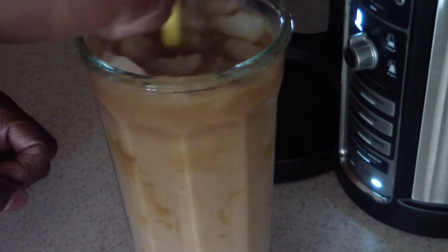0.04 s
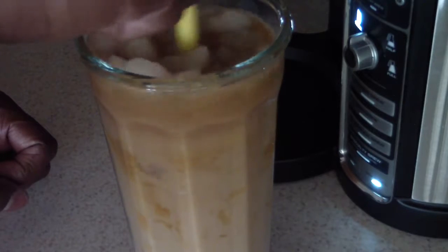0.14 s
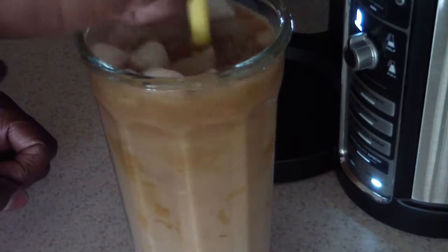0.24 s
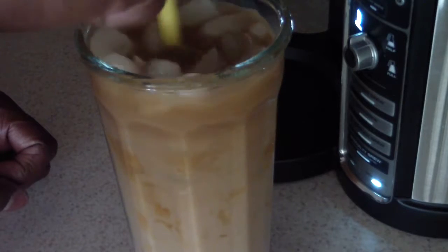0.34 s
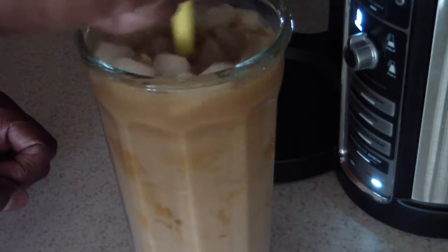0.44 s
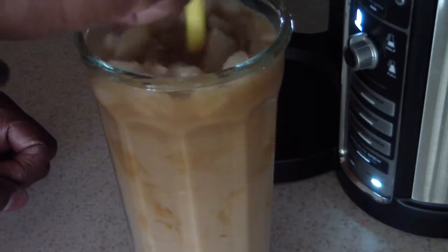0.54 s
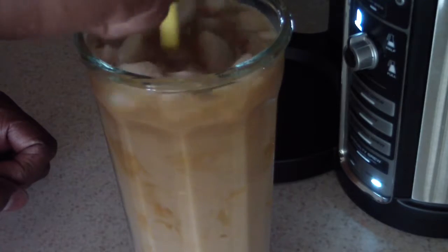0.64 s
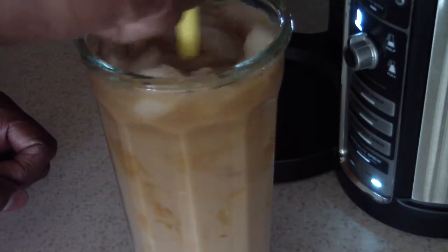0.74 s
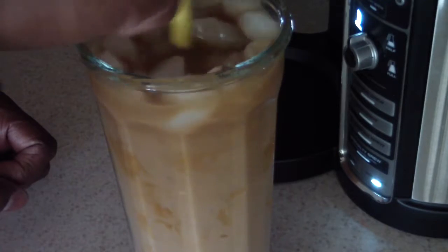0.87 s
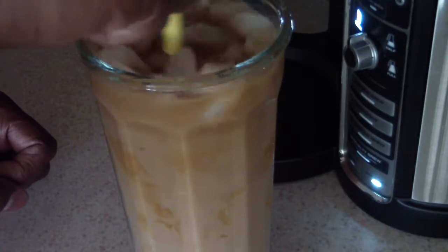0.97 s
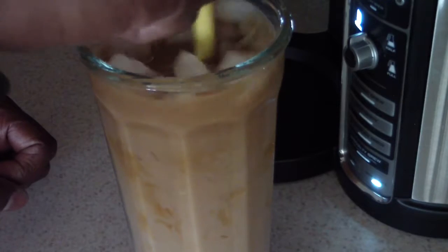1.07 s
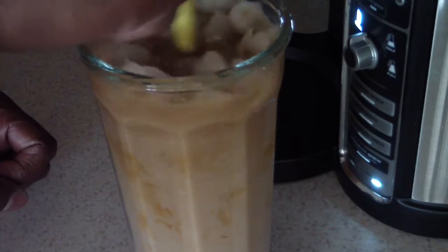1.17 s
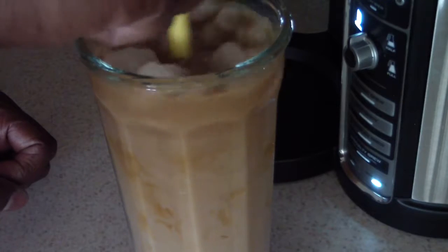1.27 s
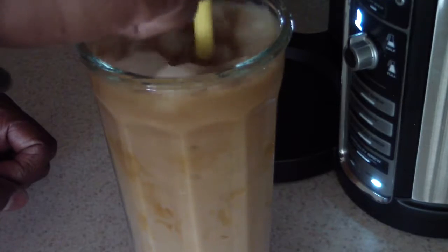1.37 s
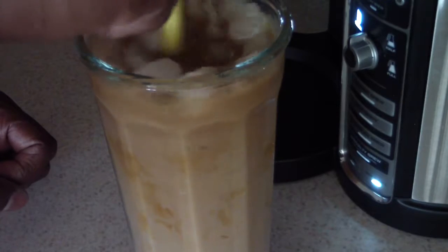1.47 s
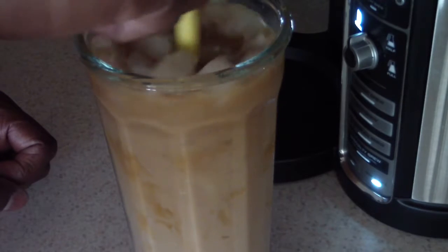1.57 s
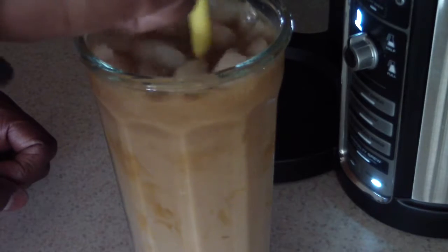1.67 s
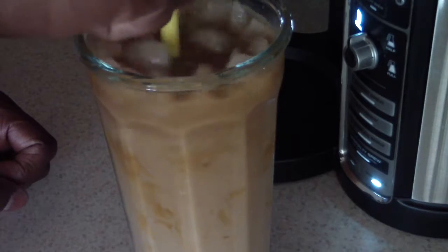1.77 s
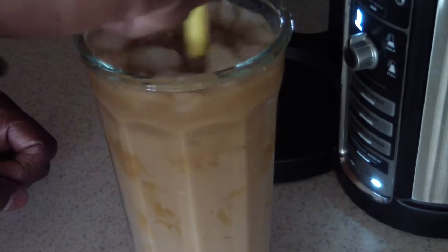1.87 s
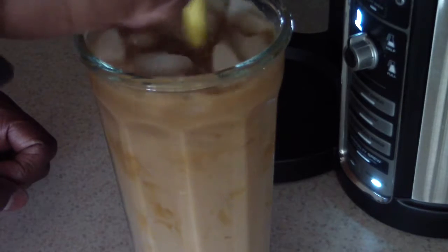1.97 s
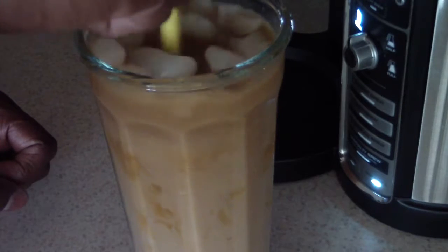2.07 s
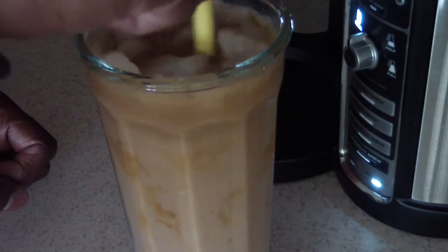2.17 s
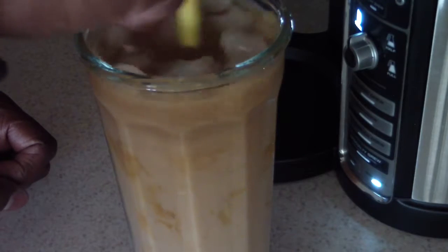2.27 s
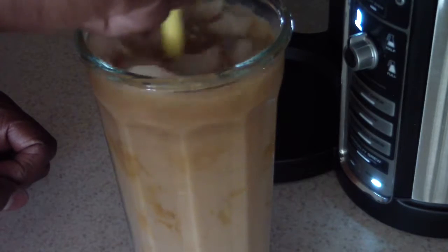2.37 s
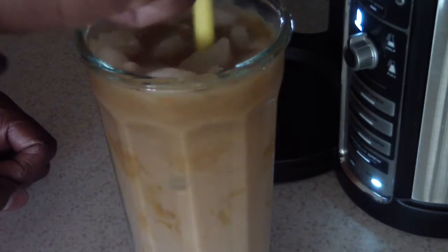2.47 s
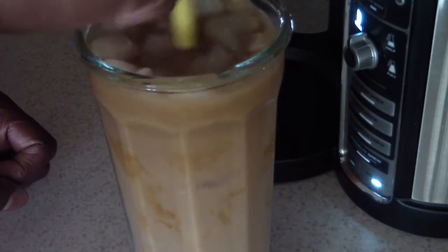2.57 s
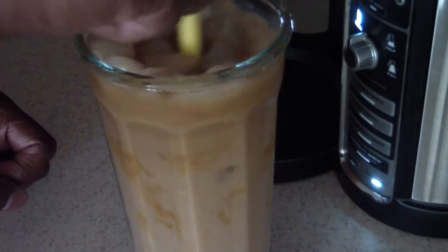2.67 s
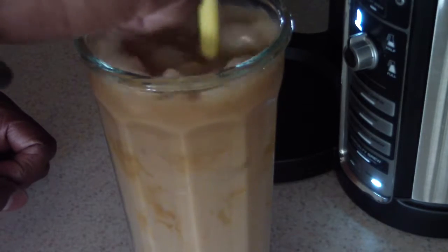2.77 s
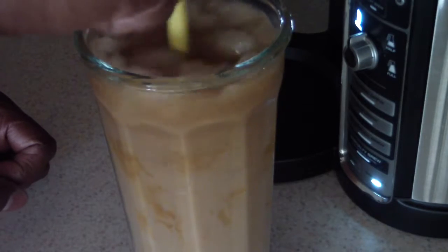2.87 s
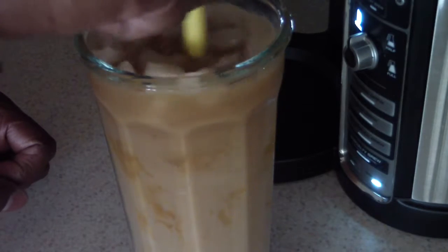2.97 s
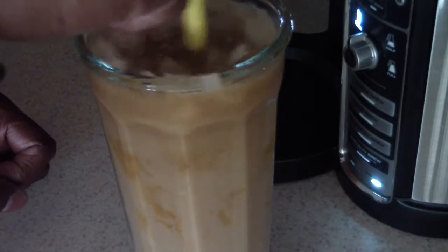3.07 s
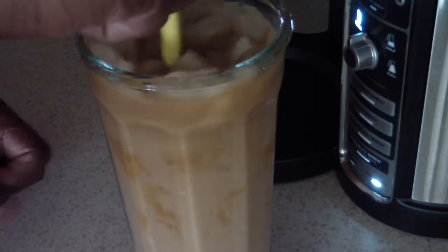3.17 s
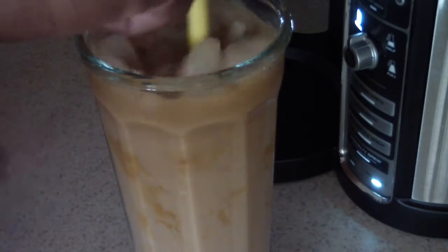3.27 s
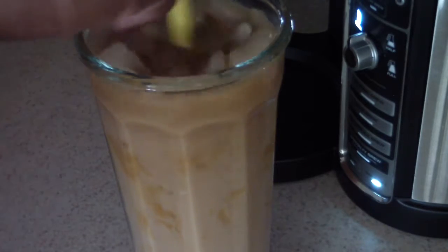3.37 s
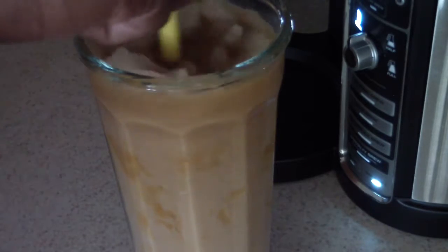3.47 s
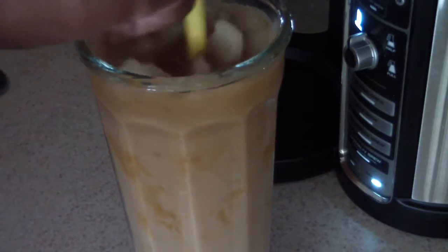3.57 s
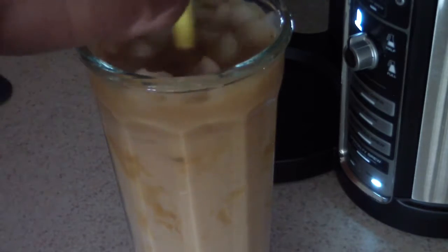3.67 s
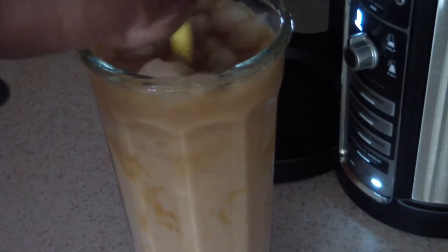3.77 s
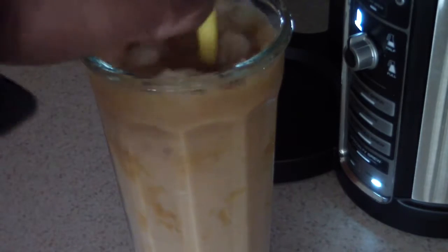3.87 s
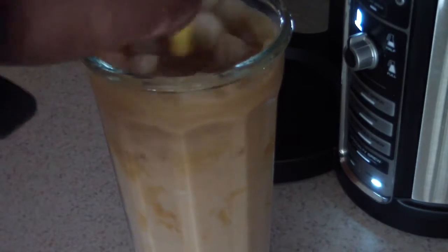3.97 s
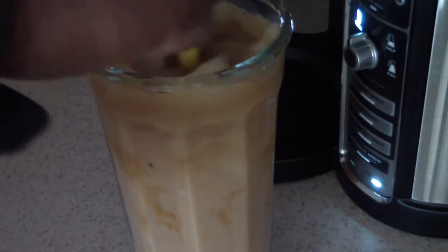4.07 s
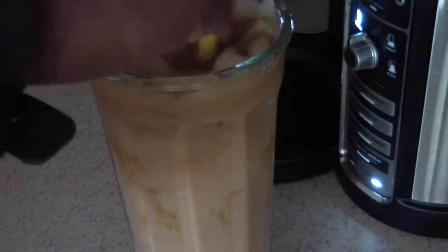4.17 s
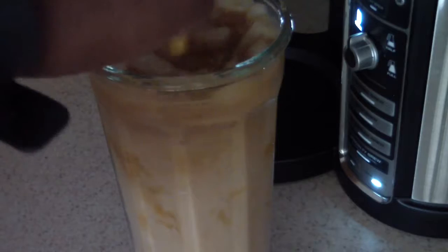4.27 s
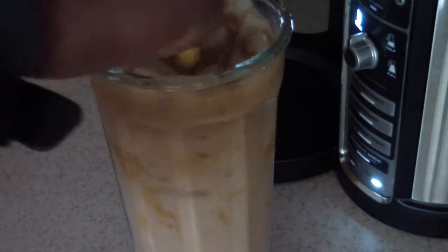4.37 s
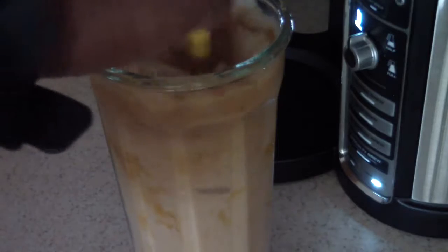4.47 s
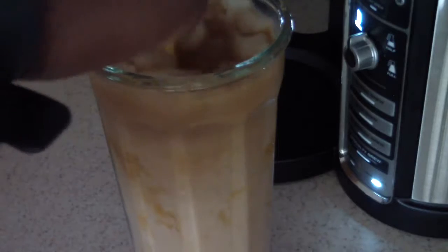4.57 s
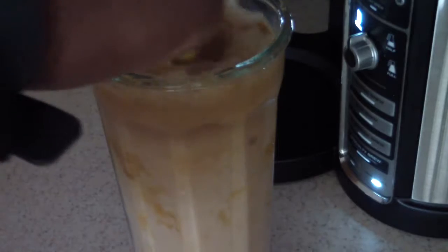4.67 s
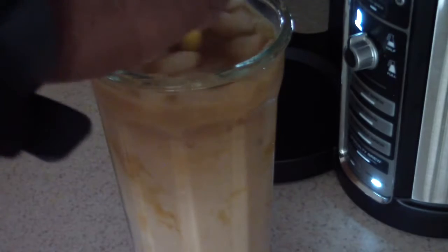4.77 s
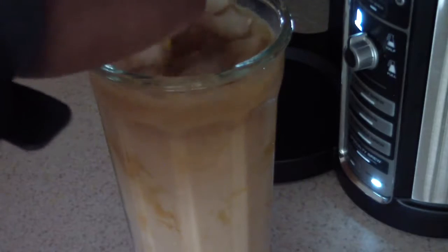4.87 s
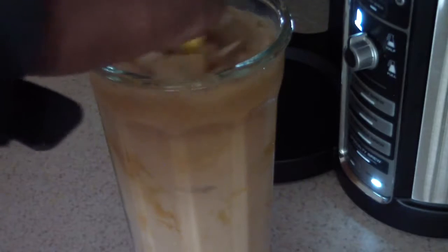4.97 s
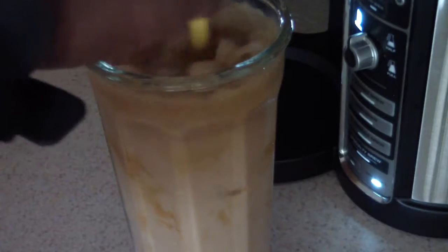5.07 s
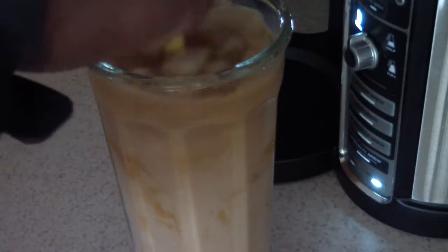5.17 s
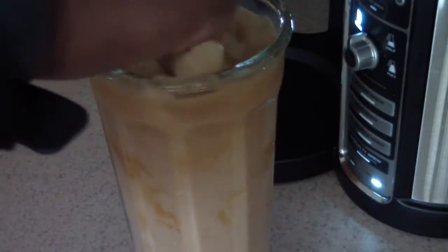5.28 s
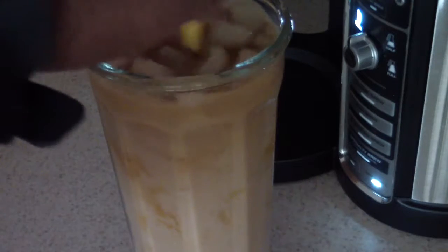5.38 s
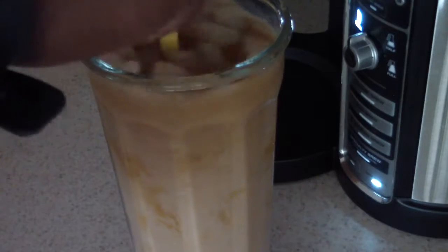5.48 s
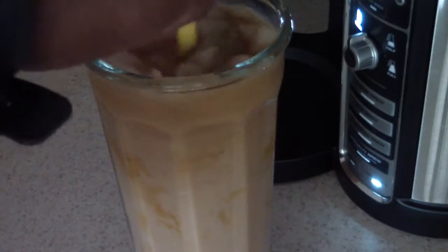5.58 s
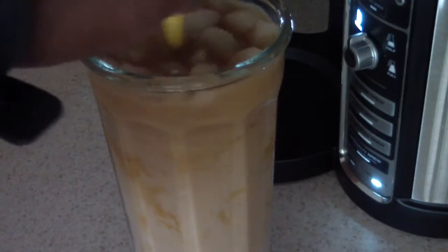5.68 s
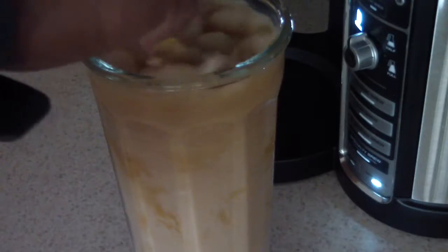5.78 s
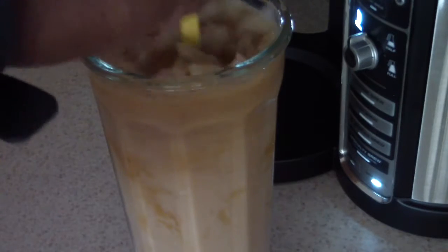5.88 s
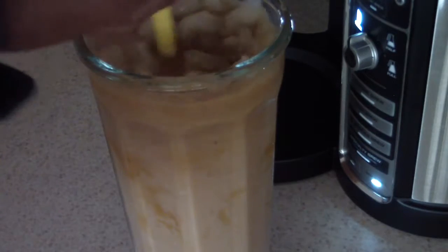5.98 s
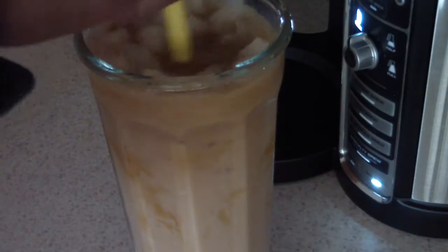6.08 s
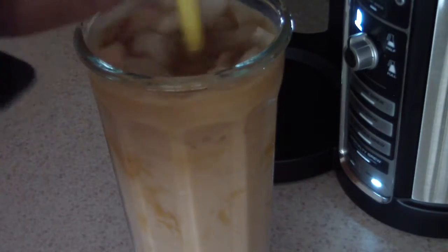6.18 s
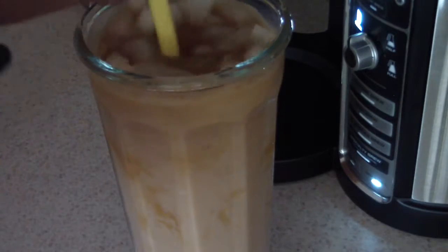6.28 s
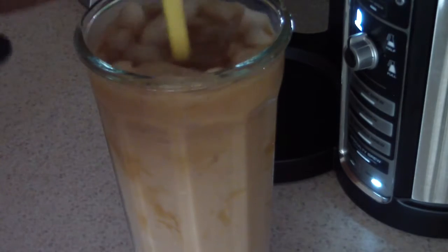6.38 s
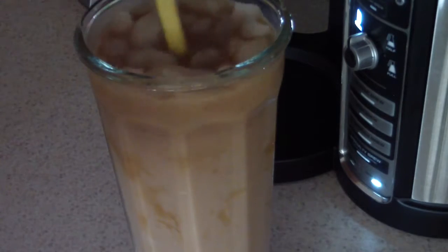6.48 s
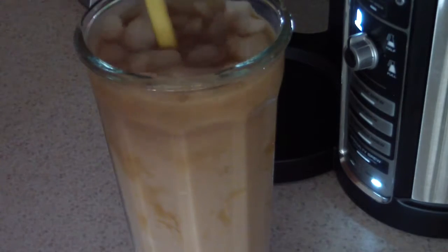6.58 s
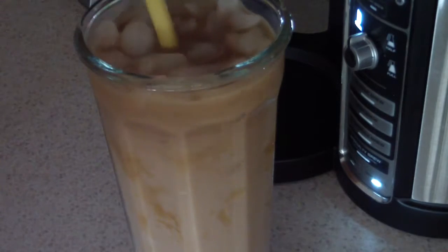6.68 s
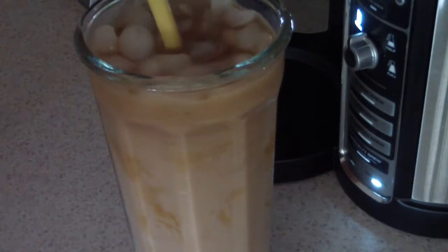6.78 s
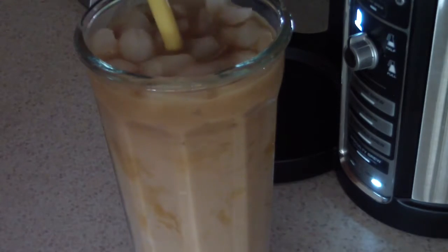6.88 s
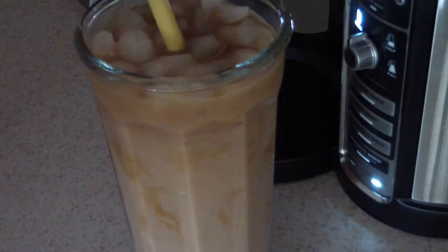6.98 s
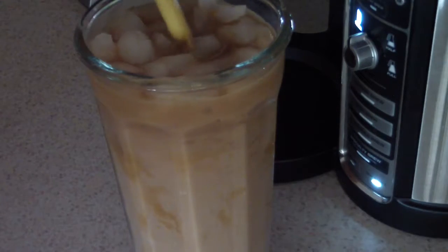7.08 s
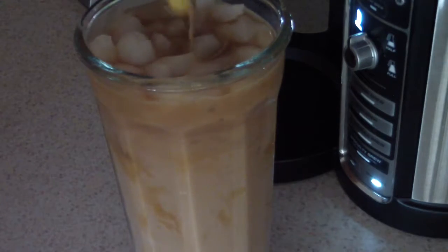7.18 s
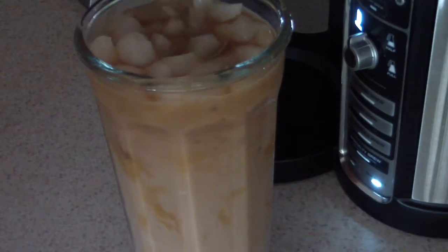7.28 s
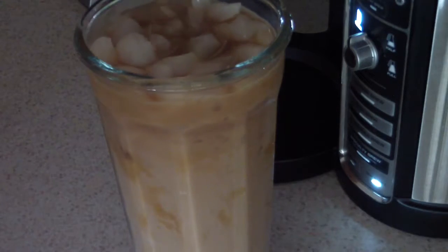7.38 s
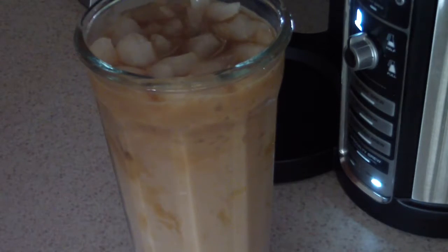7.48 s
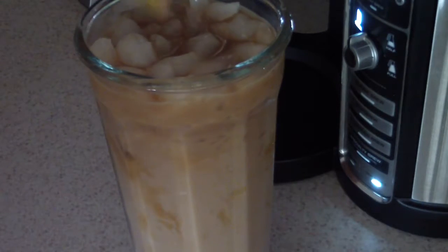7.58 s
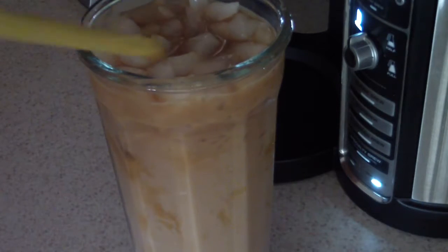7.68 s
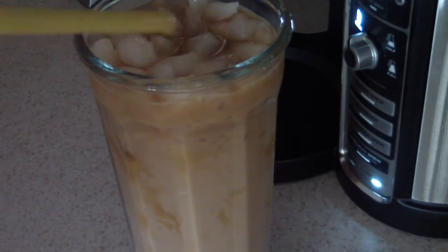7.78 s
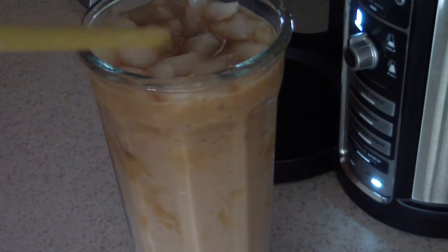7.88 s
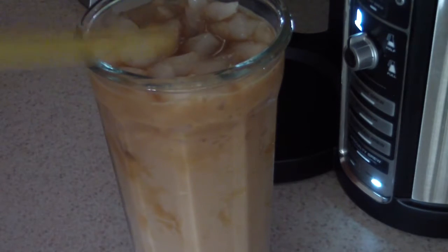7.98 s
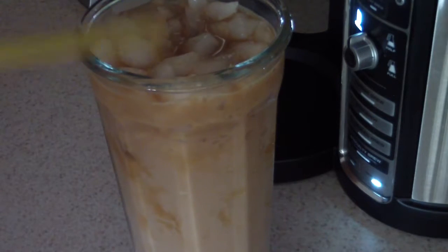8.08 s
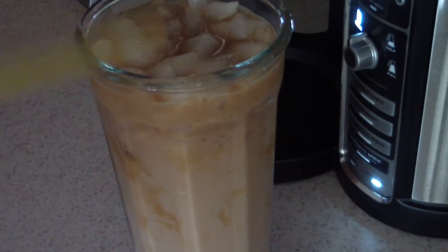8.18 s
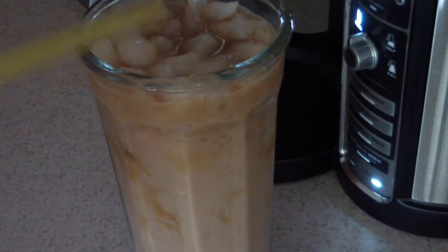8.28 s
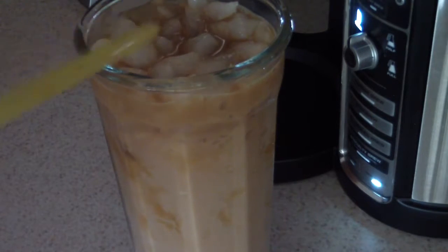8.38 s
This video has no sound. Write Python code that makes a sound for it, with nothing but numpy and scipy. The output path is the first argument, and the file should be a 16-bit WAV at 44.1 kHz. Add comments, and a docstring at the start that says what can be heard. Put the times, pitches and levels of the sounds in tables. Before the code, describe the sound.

Ice cubes grind and clink as a spoon stirs a sloshing drink in a glass, then a few soft ticks follow.

```python
"""A tall glass of iced coffee on a kitchen counter, close to a stereo pair of microphones.
From the start a spoon stirs, about three strokes a second: the cubes grind and clink, the full glass
rings briefly, the drink sloshes, and for five seconds the base thumps on the counter. The whirl rings
loudest near 6 s. Half a second later the stirring stops, and a few soft, dry ticks with a short hollow
ring follow over the hum of the kitchen."""
import sys
import numpy as np
from scipy import signal
from scipy.fft import rfft, irfft, next_fast_len
from scipy.io import wavfile
from scipy.ndimage import uniform_filter1d

SR = 44100
rng = np.random.default_rng(int(sys.argv[2]) if len(sys.argv) > 2 else 0)


def digitize_waveform(pressure):
    """Quantize a signal to 16-bit integers and store it at the path in sys.argv[1].

    Rows of a 2-D input are taken as channels; values are limited to [-1, 1].
    """
    field = np.atleast_2d(pressure).T
    bounded = np.clip(field, -1, 1)
    quanta = np.round(bounded * 32767).astype(np.int16)
    wavfile.write(sys.argv[1], SR, quanta)


N = 372204

# shoves of the spoon that drive the cubes along the wall:
# (time [s], length [s], level [dB], weight of the low knocks [dB], sharpness [dB])
SPOON_SHOVES = [(0.08, 0.078, -33.5, 0, -4.5), (0.28, 0.19, -27, -6.5, -4.5), (0.507, 0.19, -31, -3, 1.5),
                (0.787, 0.14, -29, -3.5, -1), (0.97, 0.059, -28, -6, -2), (1.123, 0.16, -35, -1, -0.5),
                (1.449, 0.12, -27, -4.5, -2.5), (1.677, 0.2, -33.5, -6, -1.5),
                (1.748, 0.041, -29.5, 3.5, -5), (1.951, 0.076, -27, -3.5, -4.5),
                (2.036, 0.097, -28.5, -5, -3.5), (2.206, 0.17, -28, -8, -4.5),
                (2.478, 0.046, -30.5, -16, -0.5), (2.6, 0.051, -22.5, -6.5, -5),
                (2.69, 0.049, -29.5, -2, -7), (2.85, 0.13, -28.5, -3, -2), (3.109, 0.17, -27.5, -4.5, -1),
                (3.379, 0.086, -25, -5, -2.7), (3.712, 0.05, -23, -3, -4), (3.826, 0.032, -34, -1, -15),
                (3.927, 0.16, -30, -1.5, 1), (4.16, 0.1, -31, -1.5, -1.5), (4.279, 0.085, -27.5, -7, -4),
                (4.469, 0.18, -28, -5, -2), (4.746, 0.087, -33.5, -0.5, -24),
                (4.866, 0.14, -29, -0.5, -1.5), (5.041, 0.047, -31, 1, -16), (5.149, 0.11, -26.5, -3.5, -5),
                (5.353, 0.05, -25, -13, -1.5), (5.457, 0.048, -25, -8, -5.5), (5.71, 0.092, -24, -5, -3),
                (5.853, 0.16, -34, -0.8, -1.2), (6.128, 0.21, -30, -2.5, -1.5), (6.398, 0.038, -35, -1, -6)]
# the circling cubes jostle between shoves, slacken once, then drift to rest: (time [s], level [dB])
ICE_CHURN = [(0, -32.5), (2.3, -32.5), (3.05, -32), (3.9, -34), (4.8, -31), (5.48, -32), (5.57, -38.5),
             (5.69, -34.5), (5.8, -30.5), (6.35, -37.5), (6.5, -42.5), (6.63, -53), (7.2, -68), (7.5, -80)]


def stirring(attack_s=0.029, coast_t60=0.21, churn_weight_db=-5.5, churn_sharp_db=-3):
    """Shoves on top of a steady churn, as level, weight and sharpness in dB, sample by sample."""
    t = np.arange(0, N, 32) / SR
    churn_db = np.interp(t, *np.transpose(ICE_CHURN))
    power = np.outer(from_db([0, churn_weight_db, churn_sharp_db]), from_db(churn_db)) ** 2
    for start_s, length_s, level_db, weight_db, sharp_db in SPOON_SHOVES:
        # the cubes pack against the spoon, then coast
        attack = np.clip((t - start_s) / attack_s, 0, 1)
        coast = np.exp(-np.log(1000) * np.maximum(t - start_s - length_s, 0) / coast_t60)
        power += np.outer(from_db([0, weight_db, sharp_db]), from_db(level_db) * attack * coast) ** 2
    middle_db, low_db, high_db = 10 * np.log10(power)
    return in_time(np.column_stack([t, middle_db, low_db - middle_db, high_db - middle_db]))


# how strongly the cubes ring at each pitch: (frequency [Hz], level [dB])
ICE_SPECTRUM = [(600, -37.5), (900, -22), (1400, -18), (2000, -10.5), (2500, -17), (3200, -11.5),
                (4300, -9), (5600, -13.5), (7000, -11.5), (8500, -7.5), (11000, -8.5), (15000, -14.5)]


def grinding(grind_db, weight_db, sharp_db, contacts_per_s=1400, quality=8.7, share_s=0.02):
    """Cubes knock and slip in quick succession; each contact rings ice modes near a pitch of its own."""
    slip_t60, rustle_t60, rustle_db = 0.012, 0.07, -2
    hits = np.flatnonzero(rng.random(N) < contacts_per_s / SR)
    modes_hz = np.geomspace(600, 15000, 26)
    forces = from_db(5 * np.minimum(rng.exponential(1, len(hits)), 3.0))
    centre_octaves = rng.uniform(np.log2(modes_hz[0]) - .5, np.log2(modes_hz[-1]) + .5, len(hits))
    friction = rng.standard_normal((4, N))
    out = np.zeros(N)
    for k, hz in enumerate(modes_hz):
        nearness = np.exp(-.5 * (np.log2(hz) - centre_octaves) ** 2)
        strength = forces * rng.standard_normal(len(hits)) * nearness
        # the contacts of one moment share the push of the spoon
        shared = uniform_filter1d(strength ** 2, int(share_s * contacts_per_s))
        strength = rms_one(strength / np.sqrt(shared + np.mean(shared) / 2))
        low, high = np.interp(hz, [2200, 2900], [1, 0]), np.interp(hz, [6000, 8000], [0, 1])
        level_db = at_hz(ICE_SPECTRUM, hz) + grind_db[hits] + low * weight_db[hits] + high * sharp_db[hits]
        clicks = np.zeros(N)
        clicks[hits] = from_db(level_db) * strength * np.sqrt(N / len(hits))
        # after each touch the cube slips for a moment, and its neighbours rustle on
        slip = linger(clicks ** 2, slip_t60)
        rustle = linger((from_db(rustle_db) * clicks) ** 2, rustle_t60)
        rubbing = np.sqrt(slip + rustle) * friction[k % len(friction)]
        width_hz = hz / quality
        out += resonance(clicks + rubbing, hz, width_hz) * np.sqrt(SR / (np.pi * width_hz))
    return out


# cubes hitting the glass and the spoon: (time [s], level [dB], pitch of the cube [Hz])
CUBE_HITS = [(0.2765, -5.5, 3460), (0.334, -26, 3400), (0.5612, -6, 5330), (0.611, -11.5, 3060),
             (0.6814, -6.5, 3680), (0.7412, -12.5, 4050), (0.9163, -14, 3270), (1.5474, -7, 3670),
             (1.8694, -6, 12700), (1.9924, -5, 3550), (2.063, -7.5, 3520), (2.1132, -9, 10600),
             (2.2347, -11, 3550), (2.303, -12.5, 3550), (2.3116, -10.5, 3620), (2.632, -6, 3600),
             (2.6404, -10, 3100), (2.7229, -14, 3730), (2.838, -2.5, 10000), (2.8976, -4.5, 4030),
             (2.9133, -14, 3800), (3.176, -10, 4000), (3.3974, -17, 3830), (3.7205, -8.5, 5440),
             (3.7512, -15, 3840), (4.0267, -6, 4000), (4.0387, -5, 7700), (4.0792, -5.5, 3900),
             (4.2331, -8.5, 3400), (4.346, -5.5, 5740), (4.531, -7, 3450), (4.721, -7, 8900),
             (4.783, -7, 8360), (4.9373, -6.5, 3630), (4.9605, -9, 2950), (5.0, -12.5, 3130),
             (5.0806, -7, 3530), (5.254, -16, 2960), (6.24, -8.5, 3360), (6.4153, -11.5, 9300),
             (6.4404, -15.5, 3830)]


def clinks(gain_db=-4.0, cycles=25.6, size=4000):
    """A cube scrapes along and knocks: a crack, its own short ring, rebound chatter, a ping of the wall."""
    out = np.zeros(N)
    for s, level_db, hz in CUBE_HITS:
        crack, skid = rng.standard_normal((2, size))
        crack = rms_one(resonance(crack, 0.46 * min(hz, 8000), 7300))
        skid = resonance(skid * np.abs(skid), hz, 0.61 * hz)
        skid = rms_one(resonance(skid, hz, 2.7 * hz))
        chatter = from_db(-15) * skid * fade(0.11, size)
        ping = from_db(-29) * ring(1620, 0.029, size)
        knock = ring(hz, cycles / hz, size) + from_db(-12) * crack * fade(0.007, size) + chatter + ping
        scrape = from_db(-22) * (skid * fade(0.025, size))[::-1]   # swells into the knock
        add(out, s + 0.000913 - size / SR, from_db(level_db + gain_db) * np.concatenate([scrape, knock]))
    return out


def tinkles(grind_db, sharp_db, gain_db=-5.5, top_db=7.5, spread_db=11, cycles=95, count=700):
    """Small chips of ice touch and ring briefly, each at a pitch of its own; a few stand out."""
    out = np.zeros(N)
    for when, pitch, chance in rng.random((count, 3)):
        i = int(when * N)
        hz = 2900 * 4.8 ** pitch
        level_db = grind_db[i] + gain_db + pitch * (sharp_db[i] + top_db) + spread_db * chance ** 3
        add(out, i / SR, from_db(level_db) * ring(hz, cycles / hz, size=1600, rise_s=0.00013))
    return out


# resonances of the filled glass: (frequency [Hz], width [Hz], level [dB])
GLASS_MODES = [(953, 135, 4), (1412.4, 24.3, 21.5), (1660, 30, 7.5), (2036, 25, 3), (2290, 66, 0.5),
               (3045, 88, 6.5), (3354, 170, 0.5), (3635, 72, 3), (4500, 56, -4.5), (5096, 57, 6),
               (5606, 190, 1.5), (6210, 67, 6), (8050, 1470, -4.5)]


def glass(contacts):
    """The contacts, plus the ring they raise in the wall of the glass, which the drink damps."""
    wall = sum(from_db(db) * resonance(contacts, hz, width_hz) for hz, width_hz, db in GLASS_MODES)
    return contacts + wall


# the hollow in the middle of the drink rings more as it deepens: (time [s], level [dB])
WHIRL_RING = [(0, -24), (4.0, -1), (4.8, -4), (6.2, 14.5), (6.6, -4)]


def whirl(contacts, hz=952.0, width_hz=27.0):
    """The air in the hollow of the whirl rings with the contacts."""
    level_db, = in_time(WHIRL_RING)
    return from_db(level_db) * resonance(contacts, hz, width_hz)


# dull swirl of the drink and rub of the glass on the counter: (frequency [Hz], level [dB])
SWIRL_SPECTRUM = [(45, -17), (85, 0), (130, -2), (200, -12), (260, -19), (315, -2.5), (350, -9),
                  (480, -13.5), (800, -7.5), (1500, -38)]
# air pockets closing in the drink: (time [s], level [dB], pitch [Hz])
AIR_POCKETS = [(3.439, -15.5, 1250), (3.737, -20.5, 1200), (3.833, -25.5, 834), (3.836, -36, 540),
               (4.535, -20, 935), (6.425, -28, 757), (6.588, -27, 665), (6.689, -43, 590)]


def slosh(push_db, swirl_db=-16.0, bubble_db=-13.5, spread_db=13.0, bubbles=170, size=5000):
    """The drink swirls and traps bubbles, which ring with a rising pitch."""
    out = from_db(push_db + swirl_db) * noise(SWIRL_SPECTRUM)
    for when, pitch, chance in rng.random((bubbles, 3)):
        hz = 520 * 2 ** (2.1 * pitch)
        level_db = push_db[int(when * N)] + bubble_db + spread_db * (2 * chance - 1)
        add(out, when * N / SR, from_db(level_db) * ring(hz, 35 / hz, size, rise_s=0.00053, glide=2.3))
    for s, level_db, hz in AIR_POCKETS:
        add(out, s, from_db(level_db) * ring(hz, 50 / hz, size, rise_s=0.0031, glide=.3))
    return out


# the base of the glass bumping the counter: (time [s], level [dB], pitch [Hz])
BASE_BUMPS = [(0.076, -31.5, 102), (0.305, -54, 91.5), (0.476, -38, 106), (0.691, -31, 101.5),
              (0.932, -25.5, 88.8), (1.227, -21.5, 95.2), (1.522, -25.5, 102.4), (2.104, -35, 104),
              (2.373, -26, 102), (2.668, -27.5, 107), (2.952, -27.5, 102.3), (3.173, -23, 94),
              (3.454, -21.5, 94), (3.754, -43, 98), (4.658, -27.5, 108.4), (4.831, -36, 94)]
# modes of the counter: (frequency [multiple of the bump's pitch], level [dB], t60 [s])
COUNTER_MODES = [(.84, -6, 0.21), (.93, -6, 0.42), (1.05, 7, 0.056), (1.3, -17.5, 0.22), (1.8, -8.5, 0.089),
                 (2.6, -46, 0.12), (3.15, -7.5, 0.083)]
# shudder of the counter after a bump: (frequency [Hz], level [dB])
SHUDDER_SPECTRUM = [(45, -37), (80, -6), (125, -6.5), (175, -16.5), (250, -26), (305, -15), (400, -27.5),
                    (900, -81)]


def thumps(shudder_db=-17.0, shudder_t60=0.67, size=22000):
    """The stirring rocks the glass; its base softly bumps the counter, which shudders on."""
    bumps, shaking = np.zeros(N), np.zeros(N)
    for s, level_db, hz in BASE_BUMPS:
        add(shaking, s + 0.0106, from_db(level_db + shudder_db) * fade(shudder_t60, size))
        for multiple, mode_db, t60 in COUNTER_MODES:
            add(bumps, s, from_db(level_db + mode_db) * ring(hz * multiple, t60, size, rise_s=0.0039))
    low_cut = signal.butter(4, 62, "high", fs=SR, output="sos")   # the counter radiates little deep bass
    return signal.sosfilt(low_cut, bumps) + shaking * noise(SHUDDER_SPECTRUM)


# soft, dry ticks after the stirring stops: (time [s], level [dB], relative level of the ring [dB])
DRY_TICKS = [(6.496, -24, -14), (6.576, -32, -4.5), (6.695, -38, -8), (6.835, -36, -10), (6.91, -32.5, -14),
             (7.043, -32, -24), (7.418, -35, -8), (7.690, -29, -4), (8.029, -32, -11), (8.039, -21, -20),
             (8.086, -24, -8)]
# tones of the short, hollow-sounding ring of a tick: (frequency [Hz], level [dB], t60 [s])
TICK_TONES = [(1260, -7, 0.061), (1510, -3.5, 0.02), (1846, -3.5, 0.049), (3470, -13, 0.025)]


def ticks(tick_db=-4.5, tick_t60=0.0026, patter_db=-14.0, patter_t60=0.031, tones_db=-0.5, size=4000):
    """A few soft, dry ticks, each a snap of noise with a short hollow ring."""
    envelope = from_db(tick_db) * fade(tick_t60, size) + from_db(patter_db) * fade(patter_t60, size)
    tones = sum(from_db(tone_db) * ring(hz, t60, size) for hz, tone_db, t60 in TICK_TONES)
    out = np.zeros(N)
    for s, level_db, ring_db in DRY_TICKS:
        snap = rms_one(resonance(rng.standard_normal(size), 6000, 9000)) * envelope
        add(out, s, from_db(level_db) * (snap + from_db(ring_db + tones_db) * tones))
    return out


# level of the side against the mid, nearly nil from about 1.4 to 3 kHz and higher in the treble: # (frequency
# [Hz], level of side against mid [dB])
SIDE_SPECTRUM = [(90, -15), (300, -35), (700, -19), (1400, -83), (3000, -116), (5000, -19), (9000, -8.5),
                 (15000, -17)]


def kitchen(direct, room_db=-13.0, room_t60=0.75, turn_s=0.0033, size=16000):
    """The room rings faintly; each contact is heard from a direction of its own."""
    echoes = rng.standard_normal(size) * fade(room_t60, size)
    echoes /= np.linalg.norm(echoes)
    mid = direct + from_db(room_db) * signal.fftconvolve(direct, echoes)[:N]
    direction = rms_one(uniform_filter1d(rng.standard_normal(N), int(turn_s * SR)))
    panned = np.pad(mid * direction, (0, next_fast_len(N) - N))
    side = coloured(panned, SIDE_SPECTRUM)[:N]
    return np.array([mid + side, mid - side])


# room tone common to both microphones: (frequency [Hz], level [dB])
ROOM_TONE_MID = [(12, -28), (20, 2.5), (43, -9.5), (60, -7), (123, -10), (193, -15), (357, -19), (399, -20),
                 (574, -20.5), (949, -24.5), (2390, -28), (2910, -27), (6010, -30.5), (14300, -33.5),
                 (16000, -33)]
# room tone that differs between the microphones: (frequency [Hz], level [dB])
ROOM_TONE_SIDE = [(12, -28), (20, -2), (86, -7), (123, -7.5), (4060, -28.5), (9140, -25.5), (13900, -28),
                  (16000, -29)]


def room_tone(mid_db=-48.0, side_db=-52.5, hum_hz=119.7, hum_db=-56.5):
    """Behind the glass, the soft rumble and hiss of the kitchen and the hum of an appliance."""
    mid = from_db(mid_db) * noise(ROOM_TONE_MID)
    side = from_db(side_db) * noise(ROOM_TONE_SIDE)
    hum = from_db(hum_db) * np.sqrt(2) * np.sin(2 * np.pi * hum_hz * np.arange(N) / SR)
    return np.array([mid + side, mid - side]) + hum


def from_db(db):
    """Decibels as an amplitude."""
    return 10 ** (np.asarray(db) / 20)


def rms_one(x):
    """A signal scaled to rms 1."""
    return x / np.sqrt(np.mean(x ** 2) + 1e-20)


def in_time(rows):
    """Each column of a curve, sample by sample."""
    s, *columns = np.transpose(rows)
    return [np.interp(np.arange(N) / SR, s, column) for column in columns]


def at_hz(spectrum, hz):
    """A spectrum read on a log-frequency axis."""
    points_hz, points_db = np.transpose(spectrum)
    return np.interp(np.log(hz + 1e-9), np.log(points_hz), points_db)


def coloured(x, spectrum):
    """A signal filtered by a spectrum."""
    gain = from_db(at_hz(spectrum, np.fft.rfftfreq(len(x), 1 / SR)))
    return irfft(rfft(x) * gain, len(x))


def noise(spectrum):
    """Steady coloured noise of rms 1."""
    return rms_one(coloured(rng.standard_normal(next_fast_len(N)), spectrum)[:N])


def resonance(x, hz, width_hz):
    """Two-pole band-pass with gain 1 at its peak."""
    r = np.exp(-np.pi * width_hz / SR)
    feedback = [1, -2 * r * np.cos(2 * np.pi * hz / SR), r * r]
    return signal.lfilter(np.array([1, 0, -1]) * (1 - r * r) / 2, feedback, x + 1e-18)


def fade(t60, size):
    """An envelope that falls 60 dB in t60 seconds."""
    return np.exp(-np.log(1000) * np.arange(size) / SR / t60)


def ring(hz, t60, size, rise_s=1e-5, glide=0):
    """A dying sine; its pitch climbs by the share glide per second."""
    t = np.arange(size) / SR
    return np.sin(2 * np.pi * hz * t * (1 + glide * t / 2)) * fade(t60, size) * (1 - np.exp(-t / rise_s))


def linger(energy, t60):
    """Energy spread over a dying tail."""
    r = np.exp(-2 * np.log(1000) / SR / t60)
    return signal.lfilter([1 - r], [1, -r], energy + 1e-18)


def add(out, s, sound):
    """Mix a sound in at time s."""
    i = max(round(s * SR), 0)
    out[i:i + len(sound)] += sound[:N - i]


def scene():
    """Ice, glass and drink close to the microphones, with the kitchen behind."""
    grind_db, weight_db, sharp_db = stirring()
    cubes = from_db(-6) * grinding(grind_db, weight_db, sharp_db)
    contacts = cubes + tinkles(grind_db, sharp_db) + clinks()
    direct = glass(contacts) + whirl(contacts) + slosh(grind_db + weight_db) + thumps() + ticks()
    balance = from_db([[-.2], [.2]])   # the right side is a touch louder
    return (kitchen(direct) + room_tone()) * balance


def record(dry, ceiling=0.7, cutoff_hz=16000):
    """Only the very sharpest peaks are rounded; the top is cut steeply."""
    rounded = dry / (1 + (dry / ceiling) ** 6) ** (1 / 6)
    return signal.sosfilt(signal.ellip(12, .2, 80, cutoff_hz, fs=SR, output="sos"), rounded)


dry = scene()
out = record(dry)
digitize_waveform(out)
```